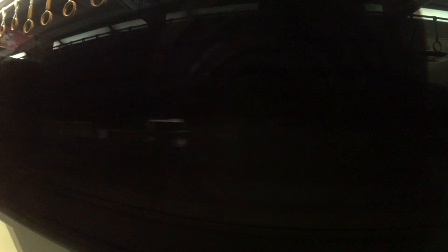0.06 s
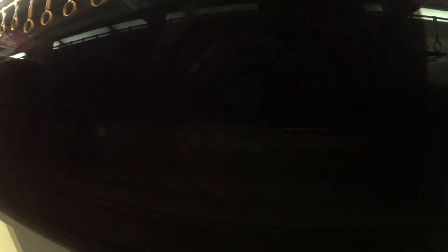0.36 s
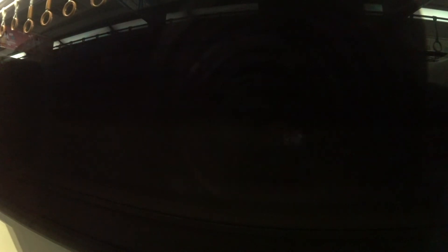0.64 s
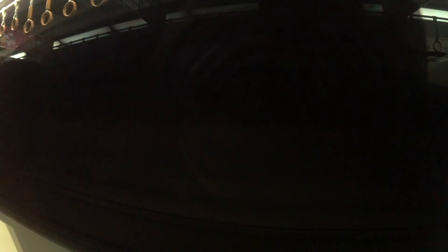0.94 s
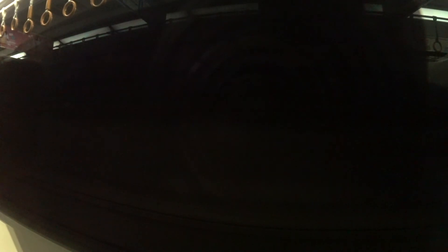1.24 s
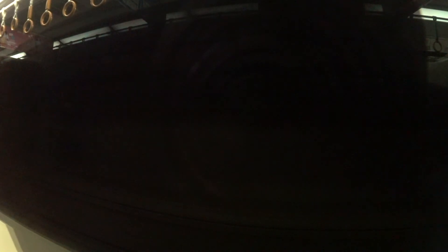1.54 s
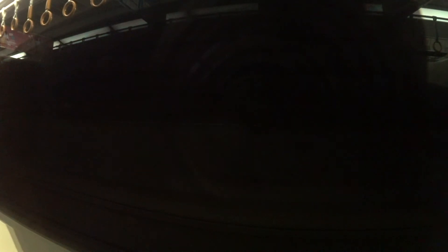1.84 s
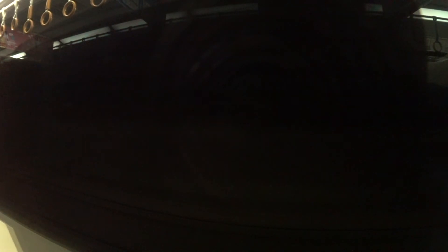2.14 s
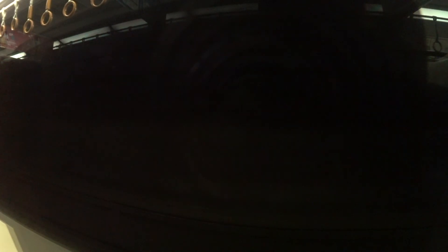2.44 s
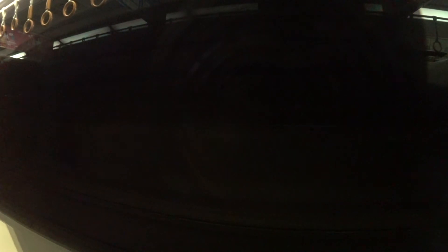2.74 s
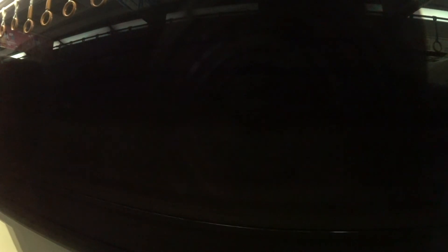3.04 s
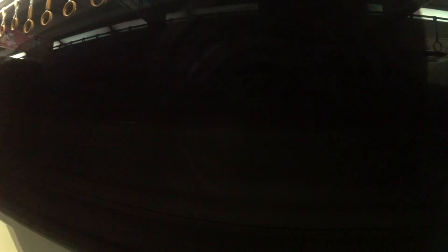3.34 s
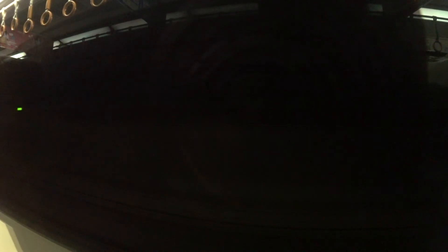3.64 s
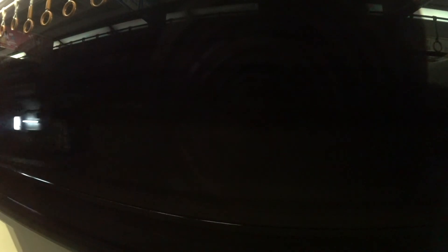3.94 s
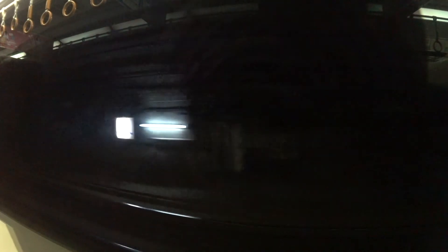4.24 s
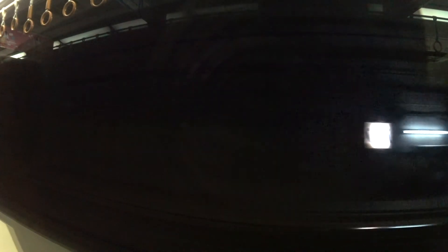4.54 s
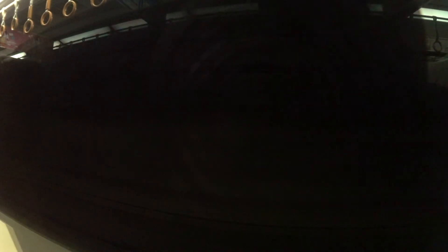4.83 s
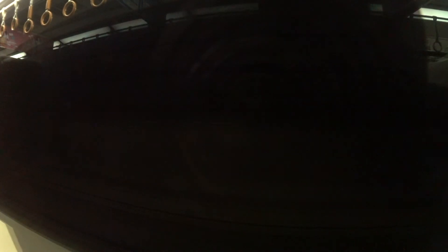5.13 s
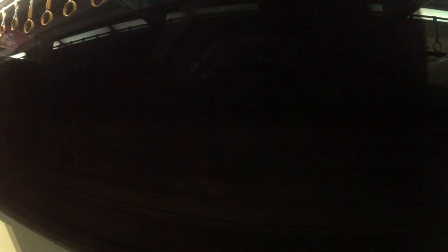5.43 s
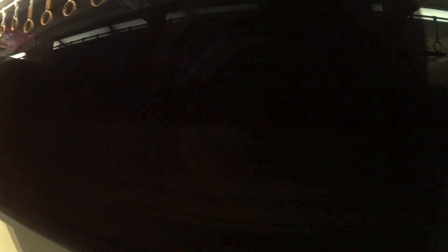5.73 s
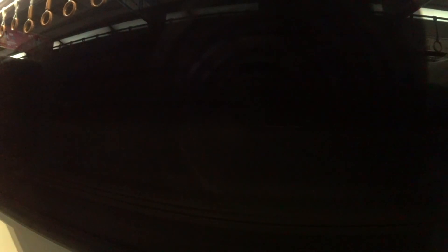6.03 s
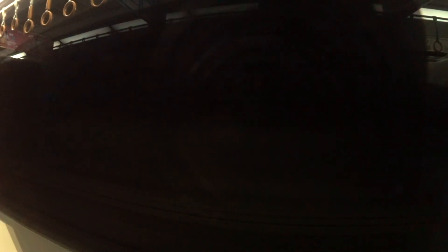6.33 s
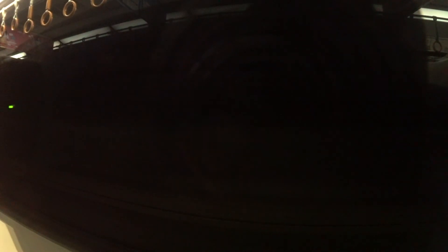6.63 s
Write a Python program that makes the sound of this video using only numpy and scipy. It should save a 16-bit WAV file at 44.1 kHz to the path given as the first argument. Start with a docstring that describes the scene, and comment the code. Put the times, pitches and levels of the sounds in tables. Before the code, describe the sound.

An electric train runs through a tunnel for nearly seven seconds, heard from inside the passenger car behind closed windows. Throughout, the wheels make a loud, steady rush over the deep rumble and shudder of the car body. A hollow, mid-pitched rail howl leads from about 1 second and swells briefly at 2 and 2.6 seconds. The car lurches with a low shudder and drone near 3 seconds. From there a lower roar takes over and grows louder, surging on rough rail between 3.5 and 4.8 seconds and again around 5.2, with a faint gritty hiss. Thin, quiet wheel squeals come between 3.4 and 6.3 seconds, the clearest at about 5.2. The floor drones briefly at several jolts from 5.2 to 6.2 seconds, with another shudder near 6. The roar eases at the very end as the train keeps rolling.

```python
"""Inside an electric train in a tunnel. The wheels run over rippled rail: first short ripples (a high
howl), then more and more long ones (a lower roar). Fine roughness rings the wheels, and the noise surges
on rough patches. The car body shudders and booms on its bogies and the floor drones at jolts. The howl
swells briefly; the wheels squeal and hiss. The tunnel throws it all back through the closed windows."""
import sys
import numpy as np
from scipy import signal
from scipy.fft import rfft, irfft, next_fast_len
from scipy.io import wavfile
from scipy.ndimage import uniform_filter1d

SR = 44100
rng = np.random.default_rng(int(sys.argv[2]) if len(sys.argv) > 2 else 0)


def bounce(signal):
    """Save signal as a 16-bit WAV file at the path given by the first command-line argument."""
    frames = np.transpose(np.atleast_2d(signal))
    limited = np.clip(frames, -1, 1)
    pcm = np.round(limited * 32767).astype(np.int16)
    wavfile.write(sys.argv[1], SR, pcm)


N = 294588
TIME_S = np.arange(N) / SR
FFT_SIZE = next_fast_len(N, True)
FREQ_HZ = np.maximum(np.arange(FFT_SIZE // 2 + 1) * SR / FFT_SIZE, 0.1)


# Ripple passing rate: time_s, long_hz, short_hz
RIPPLE_RATES = [(.55, 503, 766), (1.2, 538, 836), (2, 476, 813), (2.8, 570, 743), (3.3, 600, 777),
                (3.7, 590, 710), (4.2, 565, 725), (4.55, 423, 710), (5.3, 436, 795), (5.75, 508, 780),
                (6.05, 460, 790), (6.35, 520, 766)]
# Floor and tunnel resonances: pitch_hz, width_hz, gain_db
ROAR_MODES = [(224, 35, -1.5), (338, 75, 0.5), (419, 58, 1), (489, 65, -2.5), (548, 171, -1)]
# Rail resonances: pitch_hz, width_hz, gain_db
HOWL_MODES = [(709, 93, 2), (765.6, 68, -0.2), (856, 89, 0.5)]
# Rail bending between sleepers: pitch_hz, width_hz, gain_db
SLEEPER_MODES = [(1118, 140, -3.5), (1335, 38, -8.5)]

def rippled_rail(long_db, short_db, ring_offset_db=-20.5):
    """Ripples on the rail head shake the wheels: long ones roar and ring the rail, short ones howl."""
    long_hz, short_hz = curves(RIPPLE_RATES)
    roar = excite(ROAR_MODES, long_hz, spread_octaves=0.55, waver_db=1.66)
    roar = set_level(roar, long_db, band_hz=(300, 600), window_s=0.08)
    howl = excite(HOWL_MODES, short_hz, spread_octaves=0.12, waver_db=1.0)
    howl = set_level(howl, short_db, band_hz=(650, 920), window_s=0.19)
    ring = cabin_noise(resonances(SLEEPER_MODES))
    return roar + howl + set_level(ring, long_db + ring_offset_db, band_hz=(950, 1500))


# Rolling noise through the windows: freq_hz, density_db
ROLLING_SPECTRUM = [(200, 0), (600, 6.5), (900, 8.5), (1020, 2.5), (1250, -3), (1550, -2.5), (1800, -6.5),
                    (2150, -8), (2450, -11.5), (3200, -14), (4000, -18.5), (4500, -26.5), (5100, -37.5),
                    (7000, -60)]
# Wheel resonances: pitch_hz, width_hz, gain_db
WHEEL_MODES = [(1372, 61, -2.5), (2003, 360, -5.5), (2840, 330, -14.5), (3780, 350, -21.5)]

def rolling_rush(level_db, flutter_db=0.6):
    """Fine roughness rings the wheels over a broad rush; the wheel load flutters."""
    rush = cabin_noise(np.hypot(colour(ROLLING_SPECTRUM), resonances(WHEEL_MODES)))
    return set_level(rush, level_db, band_hz=(1000, 4000)) * undb(flutter_db * wander(25))


# Body on its springs: freq_hz, density_db
SHUDDER_SPECTRUM = [(3, -15), (10, -.2), (14, -7.5), (18, -5), (29, -15), (38, -15.5), (48, -21.5),
                    (55, -20.5), (70, -30), (110, -52)]
# Floor and walls: freq_hz, density_db
BOOM_SPECTRUM = [(40, -20), (66, 1), (82, 2), (97, -1.5), (120, -1.5), (165, -8), (205, -11.5),
                 (245, -15.5), (290, -13), (420, -25.5), (700, -44)]
# Lurches on uneven track: start_s, length_s, shudder_rise_db, boom_rise_db
LURCHES = [(.15, 0.2, 0, 0.5), (2.98, 0.14, 6.5, -2), (3.7, 0.25, 4, 2.5), (5.45, 0.32, 2, 2),
           (5.85, 0.43, 6, 0.5)]

def car_body(shudder_db=-31.5, boom_db=-36, wheel_turn_hz=6.1, throb_db=0.6):
    """The body shudders on its springs; the floor booms, pressed once a turn by out-of-round wheels."""
    shudder_rise_db, boom_rise_db = swells(LURCHES, attack_s=0.44, release_s=0.16)
    shudder = cabin_noise(colour(SHUDDER_SPECTRUM), spacing_m=0.42)
    shudder = set_level(shudder, shudder_db + shudder_rise_db, band_hz=(25, 60), window_s=0.14)
    turns = wheel_turn_hz * TIME_S + 0.2 * wander(4.5)
    throb = undb(throb_db * np.sin(2 * np.pi * turns))
    boom = cabin_noise(colour(BOOM_SPECTRUM), spacing_m=0.29, direct_share=0.092) * throb
    return shudder + set_level(boom, boom_db + boom_rise_db, band_hz=(60, 200), window_s=0.11)


# Track jolts: centre_s, half_length_s, pitch_hz, width_hz, peak_db
JOLTS = [(.8, 0.42, 273, 22, -47.5), (1.63, 0.13, 211, 39, -43), (2.98, 0.38, 235, 43, -43),
         (3.79, 0.066, 212, 20, -43), (5.17, 0.042, 403, 71, -40), (5.455, 0.062, 328, 50, -36.5),
         (5.85, 0.12, 481, 16, -34), (6.04, 0.11, 314, 63, -36.5), (6.24, 0.046, 538, 20, -39)]

def floor_drones():
    """The floor drones briefly at each jolt from the track."""
    return ringing(JOLTS, chatter_db=4.5)


# Howl swells and wheel squeals: centre_s, half_length_s, pitch_hz, width_hz, peak_db
BRIEF_TONES = [(.29, 0.26, 4070, 200, -71), (1.96, 0.12, 775, 32, -39), (2.62, 0.073, 740, 130, -38.5),
               (3.42, 0.14, 1430, 60, -58), (3.85, 0.94, 1410, 80, -54.5), (4.0, 0.053, 3540, 130, -58),
               (4.33, .08, 3300, 260, -58.5), (4.53, 0.043, 3340, 70, -58), (5.18, 0.046, 3400, 600, -64),
               (5.193, 0.15, 1374, 24, -46.5), (5.3, 0.099, 1030, 110, -44.5), (5.34, .17, 9050, 700, -77),
               (5.615, 0.08, 3360, 300, -61), (5.87, 0.3, 8500, 1400, -76), (6.25, .2, 8400, 780, -83),
               (6.198, 0.18, 1060, 90, -48), (6.27, 0.035, 3400, 490, -57)]

def brief_tones():
    """Brief ringing tones: low swells of the howl and higher wheel squeals."""
    return ringing(BRIEF_TONES, chatter_db=3.5)


# Wheel-rail contact: freq_hz, density_db
CONTACT_SPECTRUM = [(2500, -12), (5000, -1.5), (7200, 0), (9000, -1.6), (10500, -6.5), (13000, -11.5),
                    (15800, -14)]

def contact_hiss(level_db, flicker_db=0.6, grit_db=1.0):
    """Steel slipping on steel: a faint, gritty hiss that leaks in at the seals."""
    hiss = set_level(cabin_noise(colour(CONTACT_SPECTRUM)), level_db, band_hz=(5000, 11000))
    return hiss * undb(flicker_db * wander(40) + grit_db * wander(300))


def background_hiss(level_db=-77.5):
    """A steady, very faint hiss under everything."""
    hiss = cabin_noise(colour([(5000, -3), (15800, -6)]))
    return hiss * undb(level_db) / hiss.std()


# Stereo balance in the car: freq_hz, left_minus_right_db
BALANCE = [(25, -1), (100, -1.7), (160, -1), (240, -8), (350, -2.5), (500, -1.5), (750, -4), (1100, -2.5),
           (1500, -1.5), (2100, -1), (4000, -1), (4600, 4), (5300, -3), (7500, -0.5), (11000, 1.5)]

def cabin_noise(gain, spacing_m=0.313, direct_share=0.0, sound_speed_m_s=343):
    """Shaped noise filling the car: alike at both ears only for long waves or direct sound."""
    mid, side = rfft(rng.standard_normal((2, FFT_SIZE)))
    coherence = direct_share + (1 - direct_share) * np.sinc(2 * FREQ_HZ * spacing_m / sound_speed_m_s)
    mid, side = mid * np.sqrt(1 + coherence), side * np.sqrt(1 - coherence)
    freq_hz, balance_db = np.transpose(BALANCE)
    lean = undb(np.interp(np.log(FREQ_HZ), np.log(freq_hz), balance_db) / 2)
    ears = np.array([(mid + side) * lean, (mid - side) / lean])
    return irfft(gain * ears, FFT_SIZE)[:, :N]


def excite(modes, ripple_hz, spread_octaves, waver_db):
    """Each resonance grows as the ripple rate nears it, and wavers on its own."""
    out = 0
    for mode in modes:
        nearness = 1 / np.hypot(1, np.log2(mode[0] / ripple_hz) / spread_octaves)
        ring = cabin_noise(resonances([mode]), spacing_m=0.45)
        out = out + ring * nearness * undb(waver_db * wander(9))
    return out


def ringing(events, chatter_db):
    """One narrow resonance per event, swelling and dying unevenly."""
    out = np.zeros((2, N))
    for centre_s, half_length_s, pitch_hz, width_hz, peak_db in events:
        swell = np.exp(-2 * ((TIME_S - centre_s) / half_length_s) ** 2)
        ring = cabin_noise(resonances([(pitch_hz, width_hz, 0)]))
        ring = ring * swell * undb(chatter_db * wander(70))
        out += undb(peak_db) * ring * np.sqrt(np.mean(swell ** 2) / np.mean(ring ** 2))
    return out


def resonances(modes):
    """Gain of steep-sided resonances whose powers add."""
    power = 0
    for pitch_hz, width_hz, gain_db in modes:
        detuning = (FREQ_HZ - pitch_hz ** 2 / FREQ_HZ) / (1.255 * width_hz)
        power = power + (undb(gain_db) / (1 + detuning ** 2)) ** 2
    return np.sqrt(power)


def colour(points):
    """Gain through spectrum points, falling steeply above the last."""
    freq_hz, density_db = np.transpose(points)
    rolloff = np.minimum(1, freq_hz[-1] / FREQ_HZ) ** 10
    return undb(np.interp(np.log(FREQ_HZ), np.log(freq_hz), density_db)) * rolloff


def set_level(sound, level_db, band_hz, window_s=0.53):
    """Scale a sound so that its running level within band_hz follows level_db."""
    in_band = (FREQ_HZ > band_hz[0]) & (FREQ_HZ < band_hz[1])
    band = irfft(rfft(sound, FFT_SIZE) * in_band, FFT_SIZE)[:, :N]
    power = smooth((band ** 2).mean(0), int(SR * window_s))
    return sound * undb(level_db) / np.sqrt(power)


def swells(events, attack_s, release_s):
    """Attack, hold and release curves in dB, one per level column."""
    out = 0
    for start_s, length_s, *rise_db in events:
        end_s = start_s + length_s
        attack = np.interp(TIME_S, [start_s - attack_s / 2, start_s + attack_s / 2], [0, 1])
        release = np.interp(TIME_S, [end_s - release_s / 2, end_s + release_s / 2], [1, 0])
        out = out + np.outer(rise_db, attack * release)
    return out


def wander(rate_hz):
    """Smoothed random steps with unit spread."""
    hold = int(SR / rate_hz)
    steps = np.repeat(rng.standard_normal(4096)[:N // hold + 1], hold)[:N]
    drift = smooth(steps, hold)
    return drift / drift.std()


def smooth(x, samples):
    """Moving average, applied twice."""
    return uniform_filter1d(uniform_filter1d(x, samples), samples)


def curves(table):
    """Each column of a time table, per sample."""
    time_s, *columns = np.transpose(table)
    return [np.interp(TIME_S, time_s, column) for column in columns]


def undb(db):
    """Decibels to gain."""
    return 10 ** (np.asarray(db) / 20)


# Short ripples giving way to long ones: time_s, long_db, short_db
RIPPLE_LEVELS = [(0, -45.5, -45), (.52, -46, -43), (1, -44, -39.5), (1.7, -44, -40.5), (2.35, -41.5, -41.5),
                 (3.3, -37.5, -40.5), (3.8, -40, -40.5), (4.25, -37.5, -43.5), (4.58, -33.5, -40),
                 (4.9, -35.5, -45), (5.25, -36.5, -45), (5.7, -37, -45.5), (6.3, -34.5, -49),
                 (6.68, -44, -57)]
# Rough rail: start_s, length_s, ripple_surge_db, rush_surge_db, hiss_surge_db
ROUGH_PATCHES = [(.27, 0.11, 0.5, 2.5, 2), (1.53, 0.068, -7, 3.3, 5), (1.88, 0.23, 3, 1.1, 2.5),
                 (2.58, .3, 4.5, 3, 3), (3.2, 0.36, 2, 3, 5), (3.58, 0.31, 7, 3, 3.5),
                 (3.95, 0.13, 7.5, 3.5, 4.5), (4.19, 0.21, 4, 3.5, 4), (4.51, 0.3, 1, 4, 3.5),
                 (5.07, 0.35, 8.5, 5, 5.5), (5.56, 0.12, 6, 3.5, 5.5), (5.72, 0.14, 2, 5, 5.5),
                 (6.07, 0.3, -0.5, 1.5, 3)]

def scene(rush_db=-49.5, hiss_db=-75, long_share=0.48, short_share=0.29):
    """Wheel noise over the body's boom, growing with rail wear and surging on rough patches."""
    long_db, short_db = curves(RIPPLE_LEVELS)
    wear_db = long_db - long_db.mean()
    # The roar builds up in the tunnel; the hiss bites at once.
    ripple_surge_db, rush_surge_db, _ = swells(ROUGH_PATCHES, attack_s=0.22, release_s=0.17)
    *_, hiss_surge_db = swells(ROUGH_PATCHES, attack_s=0.05, release_s=0.2)
    body = car_body() + floor_drones()
    ripples = rippled_rail(long_db + long_share * ripple_surge_db,
                           short_db + short_share * ripple_surge_db)
    rush = rolling_rush(rush_db + 0.064 * wear_db + rush_surge_db)
    hiss = contact_hiss(hiss_db + 0.14 * wear_db + hiss_surge_db)
    return ripples + rush + body + brief_tones() + hiss + background_hiss()


def record(dry, fade_s=0.006, cutoff_hz=15700):
    """Short fade-in and a steep low-pass."""
    fade_in = np.sin(np.pi / 2 * np.minimum(TIME_S / fade_s, 1)) ** 2
    lowpass = signal.ellip(8, 0.05, 70, cutoff_hz, fs=SR, output="sos")
    return signal.sosfilt(lowpass, dry * fade_in)


dry = scene()
out = record(dry)
bounce(out)
```